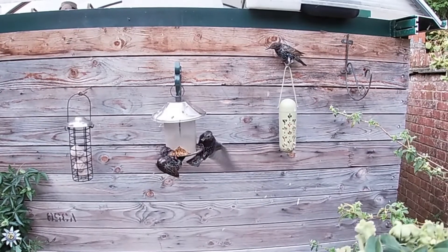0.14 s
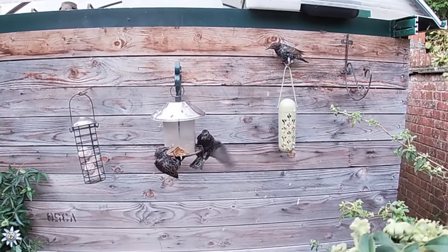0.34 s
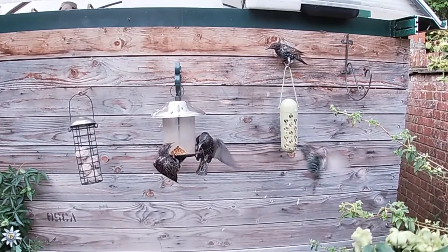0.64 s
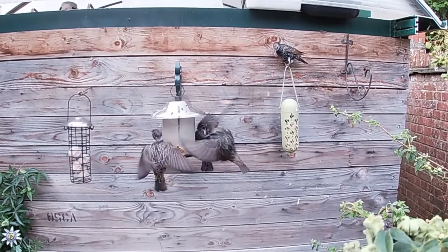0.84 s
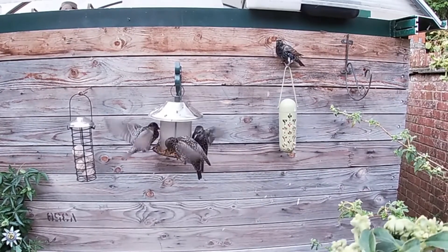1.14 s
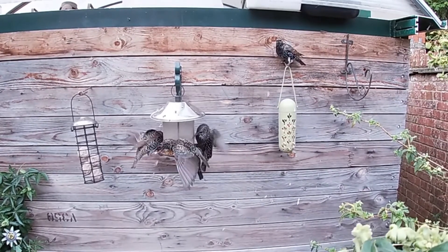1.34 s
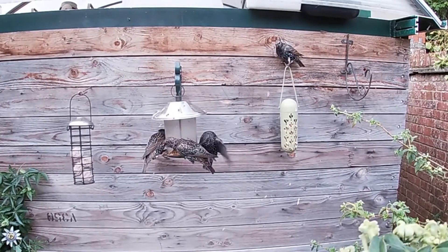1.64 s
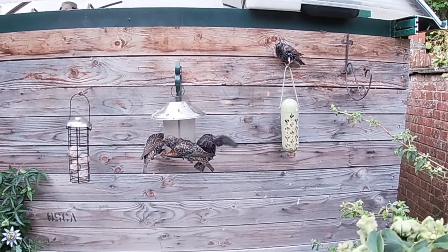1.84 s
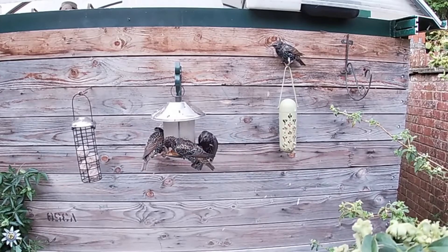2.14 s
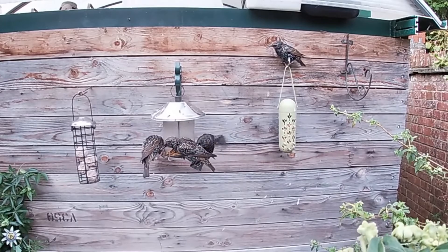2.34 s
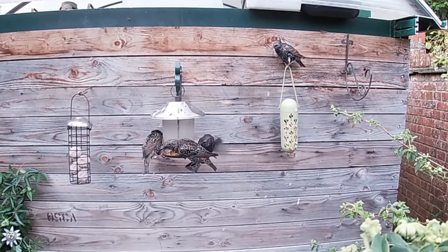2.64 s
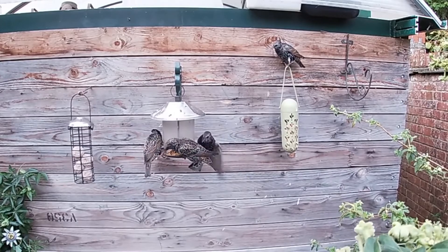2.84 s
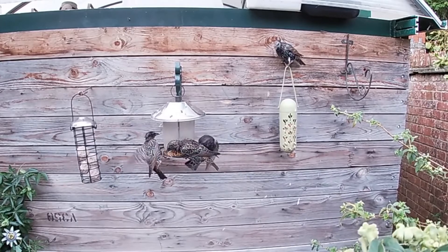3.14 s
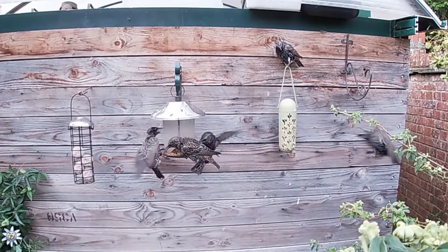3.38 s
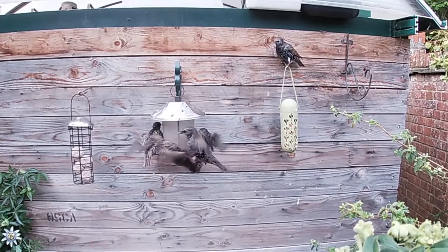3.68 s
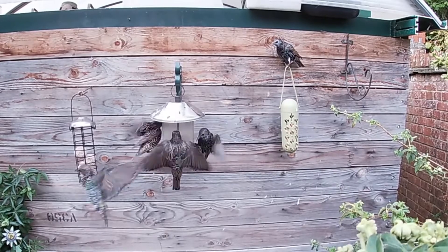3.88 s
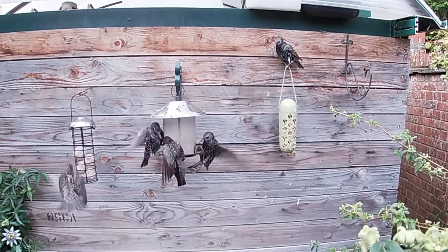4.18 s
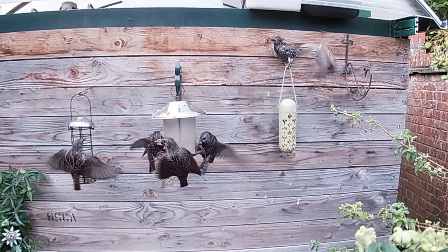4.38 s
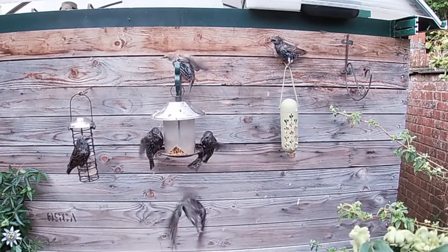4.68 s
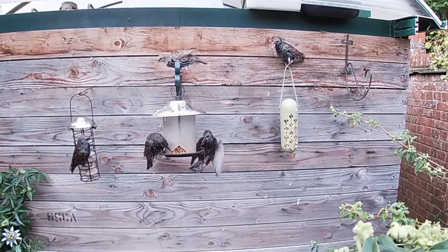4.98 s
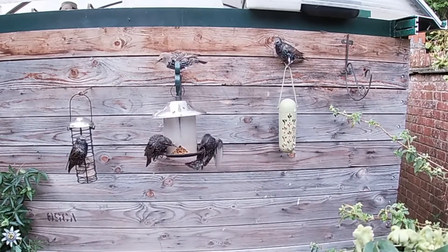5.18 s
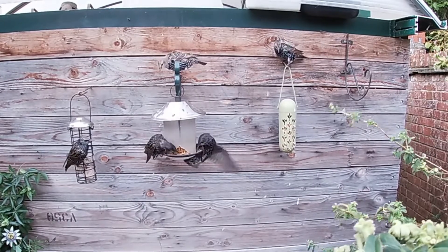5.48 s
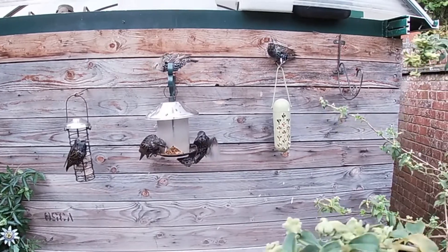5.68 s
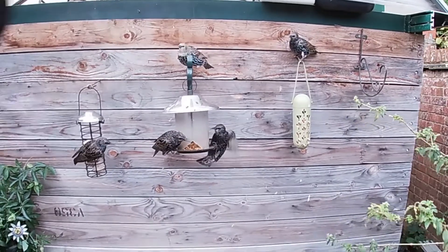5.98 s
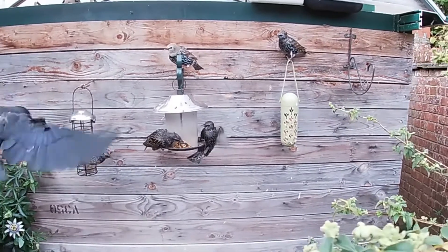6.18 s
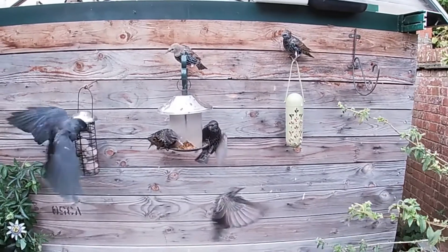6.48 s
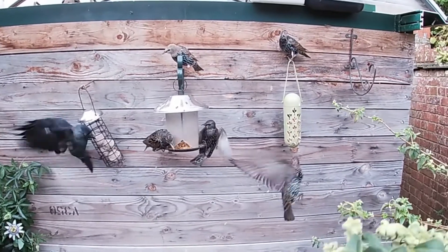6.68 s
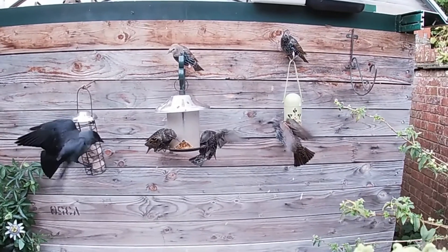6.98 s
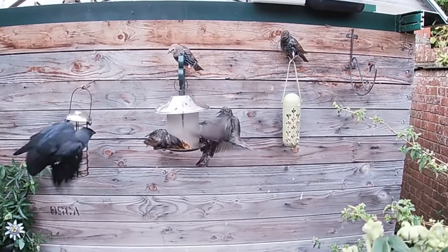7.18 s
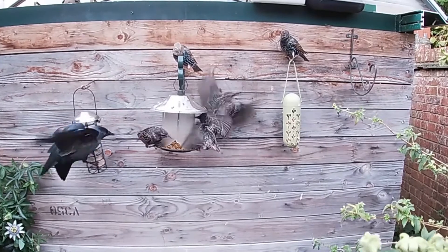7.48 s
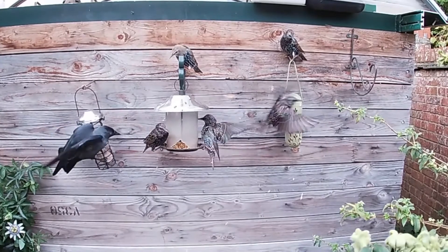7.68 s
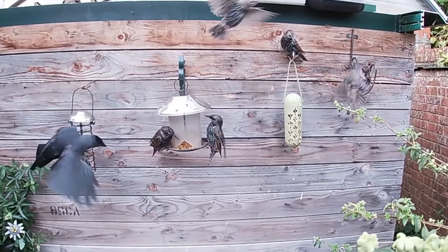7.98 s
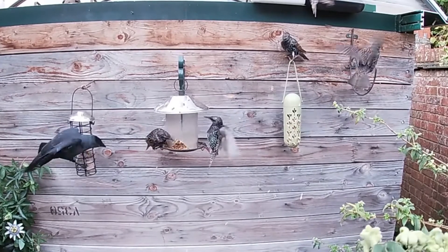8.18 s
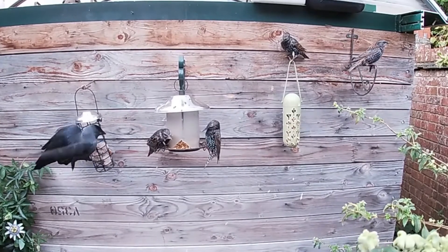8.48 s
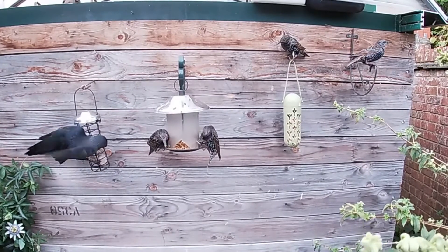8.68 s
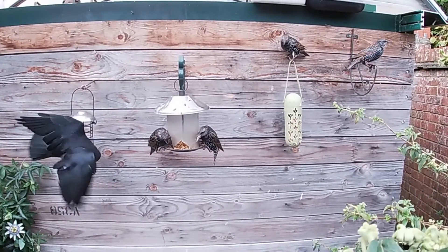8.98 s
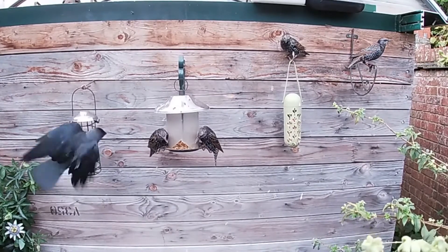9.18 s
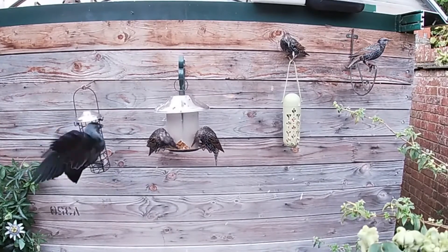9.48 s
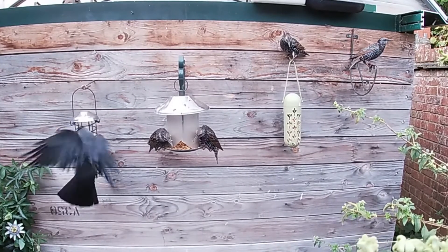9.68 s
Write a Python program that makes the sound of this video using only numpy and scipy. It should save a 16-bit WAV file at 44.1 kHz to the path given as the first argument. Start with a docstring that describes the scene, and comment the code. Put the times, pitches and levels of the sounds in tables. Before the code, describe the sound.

A close, dry garden ambience with slight echo from the boards: starlings chatter and shriek over food, wings whirr and feeders bump the wood. The squabble is densest in the first five seconds or so, then a rumbling gust buffets the microphone as a jackdaw flies in. Sparse upward chips and short scolds follow, with a burst of feather rustle, ending in soft wingbeats.

```python
"""At a wooden garden fence hung with feeders, starlings squabble close to the microphone.
They give trembling screams, hoarse rasps, short squeaks and two-voiced alarm chips, all built from swept sines.
Shaped noise makes the snapping beaks, flapping wings and rustle; ringing modes make feeders bump the boards.
A jackdaw sweeps past the microphone with a gust of low noise, then flutters on a feeder."""
import sys
import numpy as np
from scipy import signal
from scipy.fft import rfft, irfft, next_fast_len
from scipy.io import wavfile
from scipy.ndimage import uniform_filter1d

SR = 44100
rng = np.random.default_rng(int(sys.argv[2]) if len(sys.argv) > 2 else 0)


def dump(signal):
    """Clip the signal to [-1, 1] and save it as 16-bit WAV at the path in sys.argv[1]."""
    limited = np.clip(np.atleast_2d(signal).T, -1, 1)
    pcm = np.round(limited * 32767).astype(np.int16)
    wavfile.write(sys.argv[1], SR, pcm)


N = 433503
TIME = np.arange(N) / SR
CALL_TIME = TIME[:SR // 3]


def gain_of(db):
    """Decibels to amplitude."""
    return 10 ** (np.asarray(db) / 20)


def evened(x):
    """Scales to rms 1."""
    return x / np.sqrt(np.mean(x ** 2) + 1e-20)


def peaked(x):
    """Scales to peak 1."""
    return x / abs(x).max()


def add(mix, s, sound):
    """Mixes a sound in at a time in seconds."""
    part = mix[max(round(s * SR), 0):][:len(sound)]
    part += sound[:len(part)]


def colour(x, points):
    """Filters by a spectrum of (frequency [Hz], level [dB]) points, joined on a log-frequency scale."""
    hz, db = np.transpose(points)
    padded = next_fast_len(len(x))
    f = np.fft.rfftfreq(padded, 1 / SR)
    gain = gain_of(np.interp(np.log(f + 1), np.log(hz), db))
    return irfft(rfft(x, padded) * gain, padded)[:len(x)]


def wander(size, hz):
    """Smooth random movement of about rms 1, with a Gaussian spectrum about hz wide."""
    padded = next_fast_len(size + SR // 8)
    f = np.fft.rfftfreq(padded, 1 / SR)
    lowpass = np.exp(-.5 * (f / hz) ** 2)
    return evened(irfft(rfft(rng.standard_normal(padded)) * lowpass, padded))[:size]


def hump(size, hz, octaves):
    """Noise of rms 1 in a broad band round hz."""
    f = np.fft.rfftfreq(size, 1 / SR) + 1
    band = 1 / (1 + (np.log2(f / hz) / octaves) ** 2) ** 2.35
    return evened(irfft(rfft(rng.standard_normal(size)) * band, size))


def phase_of(hz):
    """Running phase of a frequency curve."""
    return 2 * np.pi * np.cumsum(hz) / SR


def envelope(t, length, attack, release):
    """A quick rise, a hold until the length is over, and a dying end."""
    return (1 - np.exp(-t / attack)) * np.exp(-np.maximum(t - length, 0) / release)


def played(sounds):
    """Lays (time, sound) pairs on one track."""
    mix = np.zeros(N)
    for s, sound in sounds:
        add(mix, s, sound)
    return mix


def near_fence(sounds):
    """Each sound starts at its own short distance from the boards, which send it back a moment later."""
    mix = np.zeros(N)
    for s, sound in sounds:
        add(mix, s, sound)
        add(mix, s + rng.uniform(.001, .0035), .45 * sound)
    return mix


def bed(spectrum, s, db, flutter_db, flutter_hz, patchy_db):
    """Coloured noise whose level follows a curve and flutters, its colour shifting in small patches."""
    noise = colour(rng.standard_normal(next_fast_len(N)), spectrum)
    z = signal.stft(noise, nperseg=512)[2]
    patches = uniform_filter1d(rng.standard_normal(z.shape), size=5, axis=0)
    patches = evened(uniform_filter1d(patches, size=5, axis=1))
    noise = signal.istft(z * gain_of(patchy_db * patches), nperseg=512)[1][:N]
    fluttering = evened(noise * gain_of(flutter_db * wander(N, flutter_hz)))
    return gain_of(np.interp(TIME, s, db)) * fluttering


def background():
    """Wings, feathers and leaves stir in fluttering noise over a high hiss and the garden's low air."""
    # stirring of the flock: (time [s], low wing swish level [dB], feather rustle level [dB]), before trims
    stir = [(0.0, -47, -49), (0.57, -60, -52), (0.79, -51.5, -50), (1.26, -64, -43), (2.43, -52.5, -57),
            (3.04, -77, -57), (3.42, -55.5, -47.5), (6.32, -57, -51), (7.12, -57.5, -49),
            (7.39, -52.5, -32.5), (7.64, -46, -46), (8.76, -63.5, -59), (9.33, -51.5, -47),
            (9.83, -56, -48)]
    # spectra of swish, rustle, hiss and quiet garden: (frequency [Hz], level [dB])
    swish_spectrum = [(100, -8.5), (300, -4), (600, -9), (950, -8), (1500, -22), (6000, -54)]
    rustle_spectrum = [(400, -27), (1000, -4), (1350, 3), (1800, 3), (3000, 1.5), (5000, -4), (7000, -15.5),
                       (14000, -49)]
    hiss_spectrum = [(2000, -29), (4500, 1.5), (6500, 7), (8500, 8.5), (10000, -4.5), (15000, -5)]
    garden_spectrum = [(20, 0.5), (45, -1), (90, -3), (150, 5), (200, -0.5), (300, -10.5), (500, -52),
                       (1000, -35.5), (3000, -19), (15000, -31)]
    # high, smooth hiss, then low murmur of air: (time [s], level [dB])
    hiss_level = [(0, -90), (2.8, -62.5), (3.6, -41), (4.6, -47.5), (5.3, -55), (5.9, -42), (6.5, -73),
                  (8.1, -67.5), (9.2, -46), (9.83, -47)]
    air_level = [(0, -51), (1.2, -51.5), (2.3, -47), (2.9, -51.5), (4.2, -50), (5.4, -59.5), (6.6, -48),
                 (7.4, -50.5), (8.7, -51), (9.83, -58)]
    s, swish_db, rustle_db = np.transpose(stir)
    swish = gain_of(2.5) * bed(swish_spectrum, s, swish_db, flutter_db=5, flutter_hz=24.8, patchy_db=1)
    rustle = gain_of(-2) * bed(rustle_spectrum, s, rustle_db, flutter_db=3, flutter_hz=30, patchy_db=6)
    hiss = bed(hiss_spectrum, *np.transpose(hiss_level), flutter_db=3, flutter_hz=45, patchy_db=3.5)
    air = bed(garden_spectrum, *np.transpose(air_level), flutter_db=5, flutter_hz=7, patchy_db=1.5)
    return swish + rustle + hiss + air


def flap(s, db, hz):
    """Feathers slap the air and slide over one another: a grainy puff of broad noise."""
    t = TIME[:6000]
    swell = (1 - np.exp(-t / .0012)) * np.exp(-t / .014)
    grain = gain_of(3 * wander(len(t), 110))
    return s, gain_of(db) * peaked(hump(len(t), hz, 2.5) * swell * grain)


def wing_strokes():
    """Every flap, with its echo off the boards and the colour of the feathers."""
    # wing strokes: (time [s], level before colour and trim [dB], centre of the noise [Hz])
    strokes = [(0.1002, -32, 2320), (0.146, -28, 2270), (0.3676, -18.5, 2320), (1.06, -20, 3580),
               (1.1247, -18.5, 3450), (1.4555, -24.5, 2600), (1.4955, -33, 3400), (1.5297, -23.5, 2930),
               (1.5511, -20, 2100), (1.5754, -45, 2300), (1.942, -25.5, 1920), (2.2815, -37, 2670),
               (2.776, -33, 1730), (2.9912, -26, 2780), (3.0477, -27.5, 1660), (3.2, -30, 6660),
               (3.7505, -29, 1290), (3.7957, -33.5, 1300), (4.1282, -19, 7040), (5.195, -28, 1490),
               (5.7293, -24.5, 1210), (6.2428, -27.5, 3430), (6.3794, -29.5, 3640), (7.132, -28.5, 4380),
               (7.5568, -20.5, 2760), (7.604, -34.5, 685), (7.71, -31, 1090), (7.836, -48, 694),
               (7.941, -27, 4000), (7.9982, -34, 2600), (8.2396, -23.5, 2800), (9.0785, -23.5, 1920),
               (9.381, -24.5, 3780), (9.4694, -34.5, 2140), (9.5657, -30.5, 2100), (9.622, -24, 3930),
               (9.675, -31.5, 3450)]
    # colour of the feathers: (frequency [Hz], level [dB])
    feathers = [(4500, 1.5), (7000, -14), (11000, -10.5)]
    return gain_of(0.5) * colour(near_fence(flap(*row) for row in strokes), feathers)


def snap(s, db, hz):
    """A dry click of horn on horn or plastic: noise that dies within milliseconds."""
    t = TIME[:1024]
    click = hump(len(t), hz, 1.15) * np.exp(-t / .002) * (1 - np.exp(-t / .0002))
    return s, gain_of(db) * peaked(click)


def beak_snaps():
    """Every snap and peck, with its echo off the boards."""
    # snaps and pecks: (time [s], level before trim [dB], centre of the noise [Hz])
    pecks = [(0.147, -14, 2560), (0.2083, -29, 4380), (0.721, -15, 3500), (0.7812, -8.5, 4100),
             (0.833, -13, 6450), (0.889, -11, 4860), (1.179, -15, 4400), (1.8863, -19, 2240),
             (1.96, -22, 2100), (2.0177, -15, 2160), (2.1252, -16.5, 3500), (2.475, -12.5, 3360),
             (2.596, -14.5, 3600), (3.4157, -14.5, 7600), (3.839, -19.5, 5600), (4.0729, -17, 4100),
             (4.191, -21, 6600), (4.2897, -10, 5100), (4.5696, -20, 3800), (4.6344, -15, 3960),
             (4.8802, -18.5, 2670), (4.9355, -24, 2440), (5.6653, -21, 3040), (5.7313, -17.5, 3150),
             (8.571, -26.5, 4000)]
    return gain_of(-1.5) * near_fence(snap(*row) for row in pecks)


def ring(modes, t):
    """One dying sine for each mode, of random polarity and tuned up to 2 % high."""
    tones = []
    for hz, db, t60 in modes:
        tone = np.sin(2 * np.pi * hz * rng.uniform(1.0, 1.02) * t)
        tones.append(gain_of(db - 60 * t / t60) * tone * rng.choice([-1, 1]))
    return np.array(tones)


def bump(s, db, hz, clatter_db):
    """The boards boom in the modes nearest hz while the feeder rattles briefly against them."""
    # modes of the boards, then of the feeder: (lowest tuning [Hz], relative level [dB], 60 dB decay [s])
    boards = [(73.8, -2.5, 0.7), (101.4, 2, 0.34), (130.7, 1.5, 0.22), (169, -7, 0.1), (200, 3.5, 0.095),
              (219.6, 1, 0.19), (321, -2.5, 0.059), (375, -11.5, 0.21)]
    feeder = [(480, -14.5, 0.12), (587, -3.5, 0.055), (694, -5.5, 0.055), (723, -9, 0.074),
              (1086, -20.5, 0.094), (1306, 1.5, 0.07), (1440, -38, 0.083), (2460, 11, 0.031),
              (3310, 19, 0.086)]
    t = TIME[:SR // 2]
    weights = 1 / (1 + (np.log2(np.array(boards)[:, 0] / hz) / 0.36) ** 2)
    boom = weights @ ring(boards, t) * (1 - np.exp(-t / 0.0072))
    contacts = hump(len(t), 864, 1.18) * np.exp(-t / 0.013)
    # the noisy contacts drive the feeder's modes and are heard directly as a scrape
    ringing = signal.fftconvolve(contacts, ring(feeder, t).sum(0))[:len(t)]
    clatter = gain_of(4) * peaked(ringing) + gain_of(6) * peaked(contacts)
    return s, gain_of(db) * (peaked(boom) + gain_of(clatter_db) * clatter)


def feeder_bumps():
    """Every knock of a feeder on the fence."""
    # bumps: (time [s], boom level before trim [dB], boom centre [Hz], clatter setting against the boom [dB])
    knocks = [(0.147, -20.5, 254, -4), (2.03, -35.5, 136.4, -29), (2.475, -21.5, 138, -26),
              (2.535, -27.5, 110, -19), (2.574, -36, 106, -21), (3.207, -27, 151, -11),
              (3.516, -12, 148, -18.5), (3.554, -21.5, 99, -12), (3.599, -28.5, 100, -10),
              (3.838, -24.5, 149, -7), (3.899, -35, 202, 2.5), (3.968, -44.5, 135, 10.5),
              (5.004, -28.5, 135, -13), (5.63, -34, 204, 5.5), (5.669, -26, 72, 0), (5.693, -16, 116, -9),
              (5.73, -23, 120, -2.5)]
    return gain_of(-2.5) * played(bump(*row) for row in knocks)


def chatter_voice(hz, rough):
    """A buzzing trill; roughness makes the pitch lurch, the syrinx's other side cut in and hiss appear."""
    n, rough = len(hz), np.clip(rough, 0, 1)
    shake = np.sin(phase_of(72 * (1 + 0.151 * wander(n, 30))))  # trill near 72 Hz
    trill = .12 * np.minimum(4 * rough, 1.2 - rough) * shake
    lurch = rough * .09 * wander(n, 110) + np.sqrt(rough) * .1 * wander(n, 1000)
    p = phase_of(hz * (1 + trill + lurch))
    tone = evened(np.sin(p) + gain_of(-13) * np.sin(2 * p) + gain_of(-20) * np.sin(3 * p))
    partner_ratio, partner_db = 1.42, -8
    q = phase_of(hz * partner_ratio * (1 + .09 * wander(n, 90) + .04 * wander(n, 700)))
    # the second voice comes and goes, with a low difference tone against the first
    pair = evened((np.sin(q) + 0.84 * np.sin(q - p)) * gain_of(7.5 * wander(n, 60)))
    second = gain_of(partner_db) * np.sqrt(2 * rough) * pair
    hiss = .6 * np.sqrt(rough) * hump(n, (hz[0] + hz[-1]) / 2, 1.3)
    throb = gain_of(.7 * shake + 1.5 * wander(n, 160))
    return evened((tone * (1 - .5 * rough) + second + hiss) * throb)


def rasp(s, length, opening_hz, final_hz, opening_db, final_db, final_rough):
    """A hoarse, warbling scold; pitch, level and roughness settle together, quickly at first."""
    opening_rough, settle_power = 0.896, 2.4
    warble, warble_hz, stutter_db = 0.082, 31.44, 2  # share of pitch, pace, level swing
    n = len(CALL_TIME)
    unsettled = np.maximum(1 - CALL_TIME / length, 0) ** settle_power
    hz = final_hz + (opening_hz - final_hz) * unsettled
    hz = hz * np.exp(warble * wander(n, warble_hz))
    db = final_db + (opening_db - final_db) * unsettled + stutter_db * wander(n, warble_hz)
    rough = final_rough + (opening_rough - final_rough) * unsettled
    level = gain_of(db) * envelope(CALL_TIME, length, attack=0.0035, release=0.011)
    return s, level * chatter_voice(hz, rough)


def squeak(s, length, opening_hz, final_hz, db):
    """One short, nearly clean note of the same voice, arching above its glide."""
    arch, rough = 0.0673, .11  # share of pitch, roughness 0-1
    t = TIME[:SR // 10]
    done = np.minimum(t / length, 1)
    hz = (opening_hz + (final_hz - opening_hz) * done) * (1 + arch * np.sin(np.pi * done))
    return s, gain_of(db) * envelope(t, length, attack=.003, release=0.0085) * chatter_voice(hz, rough)


def chatter():
    """Rasps and squeaks off the boards, through one throat colour."""
    # rasps: (time [s], length before the dying end [s], opening pitch [Hz], final pitch [Hz],
    # opening level [dB], final level [dB], final roughness [0-1, clipped]), levels before colour and trim
    rasp_calls = [(0.309, 0.073, 2584, 3300, -51, -31.5, 0.7), (0.548, 0.28, 1458, 3000, -41, -32.5, 0.24),
                  (1.238, 0.027, 1395, 1343, -31, -36, 0.33), (1.741, 0.052, 1783, 2470, -47, -32.5, 0.62),
                  (1.961, 0.052, 5330, 5010, -31, -36, 0.3), (2.396, 0.14, 1804, 3000, -36.5, -30, 0.42),
                  (3.251, 0.21, 2405, 3682, -35.5, -36.5, 0.29),
                  (3.471, 0.076, 3900, 4120, -26.5, -32.5, 0.1),
                  (3.626, 0.034, 3220, 3520, -30, -28.5, 0.96), (3.904, 0.17, 1710, 3865, -38, -37, 0.55),
                  (4.179, 0.12, 1516, 2900, -36.5, -33, 0.57), (4.688, 0.067, 3580, 3660, -29, -34, 1.02),
                  (5.028, 0.044, 3020, 3174, -33, -31, 0.88), (5.085, 0.0342, 3435, 3770, -30, -31, 0.85),
                  (5.446, 0.095, 1800, 3030, -45, -45, 0), (5.495, 0.14, 2214, 3100, -37, -32, 0.5),
                  (5.629, 0.029, 3940, 4300, -44, -35, 0.93), (7.174, 0.087, 3293, 3710, -28, -28.5, 0.77),
                  (7.268, 0.037, 4270, 4560, -38, -29, 0.22), (7.321, 0.05, 2310, 3100, -34, -37, 0.47),
                  (8.265, 0.03, 1983, 3200, -32, -36, 0.68), (8.692, 0.028, 2360, 2840, -50, -42, 0.75)]
    # squeaks: (time [s], length before the dying end [s], opening pitch [Hz], final pitch [Hz],
    # level before colour and trim [dB]), pitches before the arch
    squeak_calls = [(0.798, 0.054, 3906, 3710, -24.5), (1.797, 0.025, 2900, 3130, -32),
                    (1.835, 0.031, 3210, 3630, -31.5), (1.885, 0.031, 4360, 3190, -39.5),
                    (2.024, 0.035, 3440, 4080, -34), (2.079, 0.017, 2440, 2110, -33),
                    (2.089, 0.032, 3210, 3750, -27.5), (2.273, 0.0091, 2410, 2560, -44),
                    (2.427, 0.02, 2480, 2666, -29), (2.504, 0.037, 3680, 4170, -28),
                    (2.542, 0.034, 3010, 3780, -29.5), (2.599, 0.024, 4470, 3380, -27),
                    (3.343, 0.024, 3840, 4400, -29.5), (3.381, 0.021, 3300, 3290, -31),
                    (3.559, 0.023, 3420, 3250, -25), (4.633, 0.0366, 3560, 3780, -33),
                    (4.748, 0.041, 3540, 3164, -26), (4.794, 0.0188, 4690, 4120, -26.5),
                    (4.822, 0.051, 4170, 3320, -31), (4.889, 0.044, 4430, 3420, -32.5),
                    (5.555, 0.045, 3145, 3296, -24), (7.273, 0.037, 3020, 2820, -31)]
    # colour of the throat: (frequency [Hz], level [dB])
    throat = [(600, -6), (1400, 1.5), (5200, -1.5), (6800, -5), (8500, -2), (11000, -16)]
    rasps = gain_of(0.5) * near_fence(rasp(*row) for row in rasp_calls)
    squeaks = gain_of(-1) * near_fence(squeak(*row) for row in squeak_calls)
    return colour(rasps + squeaks, throat)


def scream(s, length, climb, top_hz, lowest_hz, opening_db, full_db):
    """A trembling whistle that climbs, then sinks, with faint overtones and a trace of period doubling."""
    t, n = CALL_TIME, len(CALL_TIME)
    climb_speed, sag_speed = 22000, 30500  # Hz per second
    fall_from_top = np.maximum(climb_speed * (climb - t), sag_speed * (t - climb))
    hz = np.maximum(top_hz - fall_from_top, lowest_hz)
    # on the way down the voice hangs above a register break, then drops quickly through it
    break_hz, break_width_hz, jump_hz = 5620, 900, 397
    from_break = (hz - break_hz) / break_width_hz
    hz = hz + jump_hz * np.tanh(4 * from_break) * np.exp(-from_break ** 2)
    # level moves between these shares of the length, then fades 2.5 dB by the end
    db = np.interp(t / length, [0.32, 0.53, 1], [opening_db, full_db, full_db - 2.5])
    level = gain_of(db) * envelope(t, length, attack=.003, release=0.0095)
    tremble, jitter, stray = 0.035, 0.0295, .014  # shares of the pitch
    shake = np.sin(phase_of(150 * (1 + 0.324 * wander(n, 65))))  # tremble near 150 Hz
    p = phase_of(hz * (1 + tremble * shake + jitter * wander(n, 360) + stray * wander(n, 34.8)))
    tone = np.sin(p) + gain_of(-21) * np.sin(2 * p) + gain_of(-28) * np.sin(3 * p)
    tone += gain_of(-23) * np.sin(p / 2)  # period doubling
    fuzz = gain_of(-13) * wander(n, 1180) * np.sin(p)
    return s, level * evened(tone * gain_of(2.8 * wander(n, 150)) + fuzz)


def starling_screams():
    """Every scream, with its echo off the boards."""
    # screams: (time [s], length before the dying end [s], time to the top [s], top pitch [Hz],
    # lowest pitch [Hz], opening level [dB], full level [dB]), pitches before break and tremble
    calls = [(0.735, 0.23, 0.046, 8820, 4850, -33, -15.5), (1.085, 0.19, 0.036, 9020, 4450, -36, -19),
             (3.19, 0.036, 0.014, 7160, 7130, -31, -31), (3.42, 0.2, 0.056, 9010, 3830, -21.5, -17.5),
             (3.696, 0.019, 0.0014, 6760, 5900, -43, -29.5),
             (4.07, 0.054, 0.0017, 6540, 5300, -33.5, -35.5),
             (4.131, 0.055, 0.011, 7170, 6160, -30.5, -24.5), (4.194, 0.04, 0.0058, 6950, 5370, -29, -25.5),
             (4.297, 0.089, 0.015, 9200, 8860, -27, -27.5), (4.608, 0.12, 0.026, 8930, 5770, -28.5, -34),
             (4.696, 0.035, 0.0016, 6420, 5810, -27, -17), (4.743, 0.035, 0.0044, 6900, 6130, -30, -33),
             (5.671, 0.12, 0.01, 8240, 5970, -34, -34.5)]
    return near_fence(scream(*row) for row in calls)


def gust(peak, db, rise, fall):
    """Air swells and dies over the microphone; the hardest push sheds smaller, higher eddies."""
    t, n = TIME[:SR] - .5, SR
    force = gain_of(db) * np.exp(np.minimum(t / rise, -t / fall))
    eddies = gain_of(-3) * (force / gain_of(-13)) * hump(n, 372, 0.79)
    return peak + t[0], force * (.5 * hump(n, 58, 1.1) + .7 * hump(n, 130, 1.1) + eddies)


def overload(x):
    """The strongest draughts softly overload the microphone."""
    ceiling = .36
    return ceiling * np.tanh(x / ceiling)


def wing_draughts():
    """Every gust from passing wings, right at the microphone."""
    # draughts: (peak time [s], force before overload [dB], rise time [s], fall time [s])
    gusts = [(3.541, -22.5, 0.02, 0.02), (5.72, -27.5, 0.047, 0.018), (5.99, -24, 0.066, 0.12),
             (6.022, -15, 0.0054, 0.01), (6.054, -11, 0.029, 0.0078), (6.167, -21.5, 0.031, 0.018),
             (7.039, -45, 0.057, 0.081)]
    return overload(played(gust(*row) for row in gusts))


def chip(s, length, sweep_time, low_hz, low_db, high_hz, high_db):
    """A low arch and a steep upward sweep sound together, with their sum and difference tones."""
    t = TIME[:SR // 8]
    n = len(t)
    arch_s, low_hold_s, droop_share, start_share = .07, .06, .3, .26
    # the low pitch droops at both ends; the high one starts at a share of its top
    droop = droop_share * (2 * np.minimum(t / arch_s, 1) - 1) ** 2
    low = phase_of(low_hz * (1 - droop) * (1 + 0.0058 * wander(n, 330)))
    climb = np.interp(t, [0, sweep_time], [start_share, 1])
    high = phase_of(high_hz * climb * (1 + .035 * wander(n, 450)))
    harmonics_db = [0, 2, -5, -5]
    arch = sum(gain_of(db) * np.sin((k + 1) * low) for k, db in enumerate(harmonics_db))
    sweep = np.sin(high) + gain_of(-8) * np.sin(high + low) + gain_of(-9) * np.sin(high - low)
    sweep *= 1 + .55 * wander(n, 120) * np.sin(low / 2)
    sweep += gain_of(-10) * hump(n, 4500, 1.3)
    attack, release, fade_db_per_s = 0.012, 0.0041, -61
    low_level = gain_of(low_db) * envelope(t, low_hold_s, attack, release)
    high_level = gain_of(high_db + fade_db_per_s * t) * envelope(t, length, attack, release)
    return s, np.sqrt(2) * (low_level * arch + high_level * sweep)


def alarm_chips():
    """Every chip, sung with both sides of the syrinx, with its echo off the boards."""
    # chips: (time [s], high voice length before the dying end [s], sweep time [s], top of the low arch [Hz],
    # low voice level [dB], top of the high voice [Hz], high voice level [dB]), levels before fade and trim
    calls = [(4.352, 0.061, 0.042, 1512, -38.5, 7730, -16), (6.758, 0.042, 0.049, 1456, -37.5, 7650, -23.5),
             (7.369, 0.043, 0.053, 1360, -41, 7600, -20.5), (7.491, 0.037, 0.057, 1360, -43.5, 6840, -26.5),
             (8.27, 0.047, 0.039, 1371, -47, 6400, -23.5), (9.189, 0.035, 0.041, 1555, -53, 7940, -34.5)]
    return gain_of(0.5) * near_fence(chip(*row) for row in calls)


def yard(x):
    """Quick echoes from fence and wall, then a short thin tail."""
    early_db, tail_db, t60 = -11, -17, 0.36  # 60 dB decay in seconds
    t = TIME[:SR // 2]
    early = np.zeros(len(t))
    early[rng.integers(SR // 600, SR // 55, size=8)] = rng.choice([-1, 1], size=8) / np.sqrt(8)
    tail = rng.standard_normal(len(t)) * gain_of(-60 * t / t60) * (t > .008)
    echoes = gain_of(early_db) * early + gain_of(tail_db) * tail / np.linalg.norm(tail)
    return x + signal.fftconvolve(x, echoes)[:N]


def scene():
    """Birds echo in the yard; bumps, draughts and background reach the microphone without its echoes."""
    birds = wing_strokes() + beak_snaps() + chatter() + starling_screams() + alarm_chips()
    return (yard(birds) + feeder_bumps() + wing_draughts() + background())[None]


def record(dry):
    """A small microphone, dull above 9 kHz, and a band limit at 15.75 kHz."""
    # response of the microphone: (frequency [Hz], level [dB])
    microphone = [(20, 9.5), (750, -1), (980, -5.5), (1300, -0.5), (1750, -4.5), (2900, -3), (8700, -7.5),
                  (9500, -9), (10500, -13.5), (11800, -19.5), (13500, -15.5), (15000, -18), (16000, -27)]
    heard = colour(dry[0], microphone)
    band_limit = signal.firwin(511, 15750, window=("kaiser", 9), fs=SR)
    return signal.oaconvolve(heard, band_limit, "same")[None]


dry = scene()
out = record(dry)
dump(out)
```